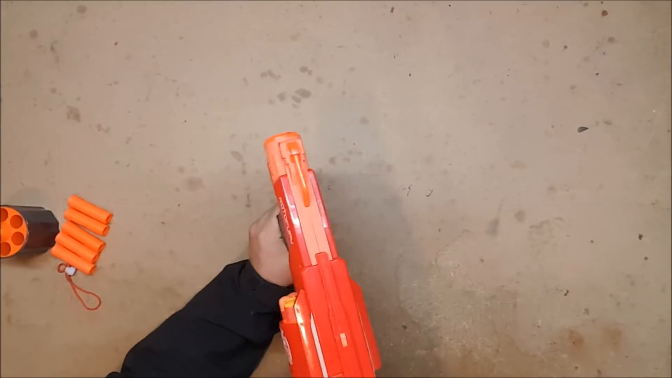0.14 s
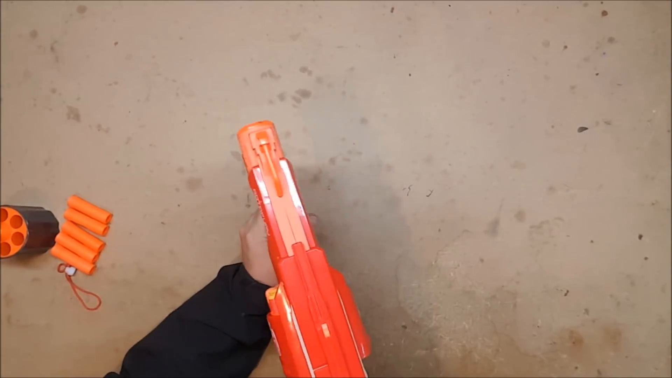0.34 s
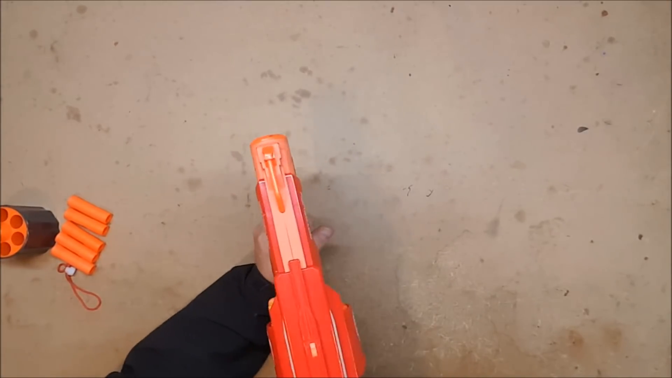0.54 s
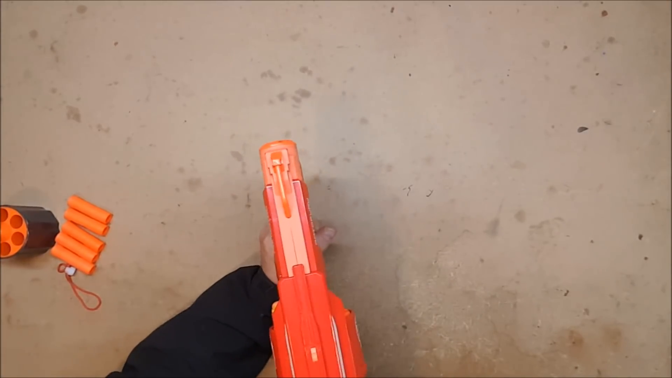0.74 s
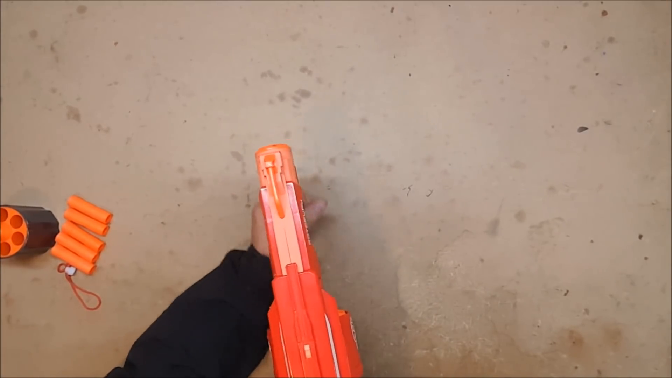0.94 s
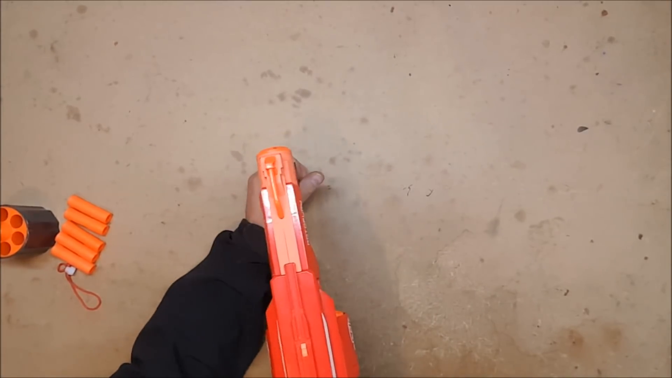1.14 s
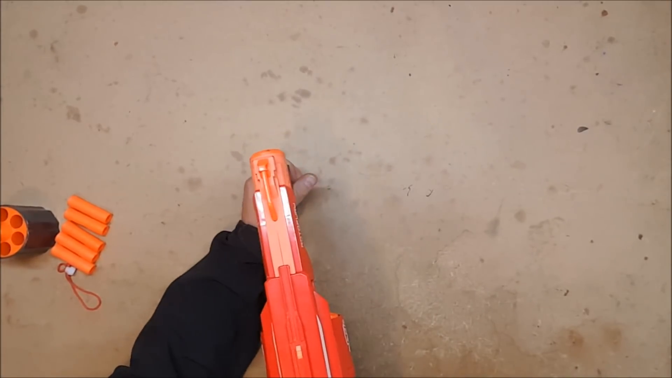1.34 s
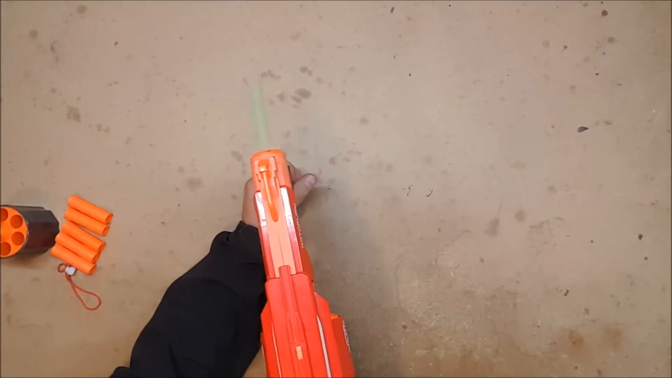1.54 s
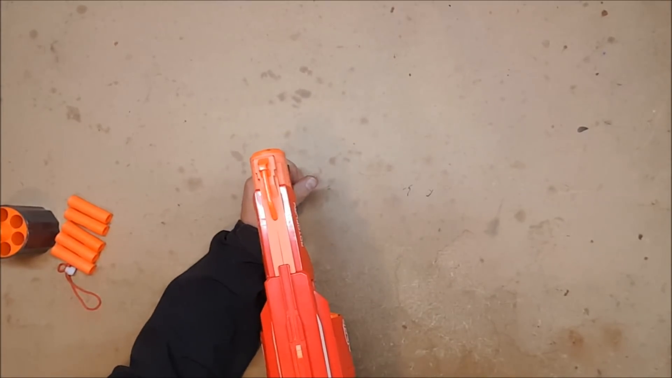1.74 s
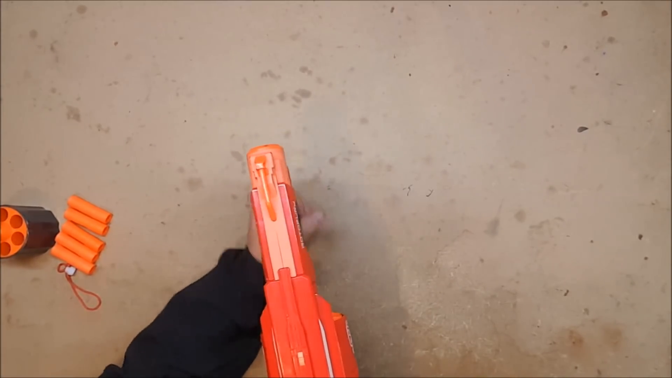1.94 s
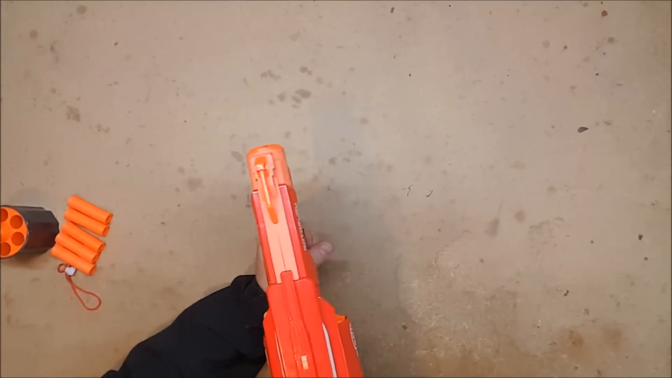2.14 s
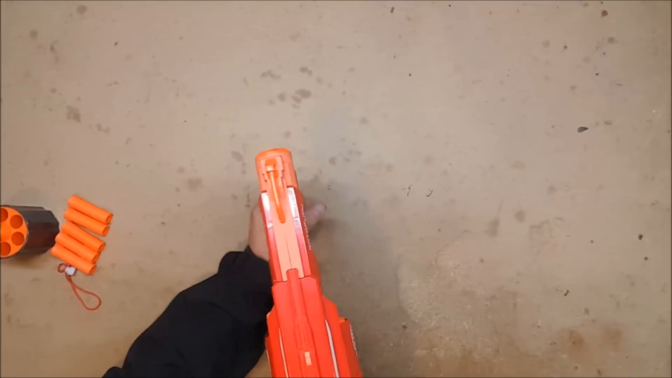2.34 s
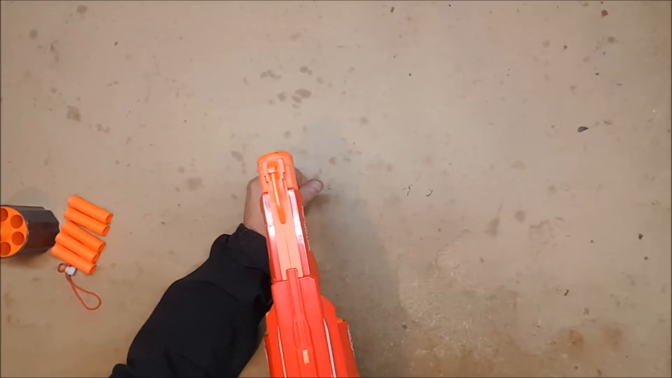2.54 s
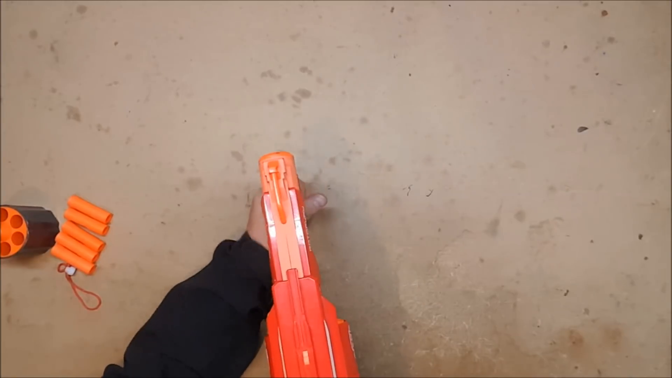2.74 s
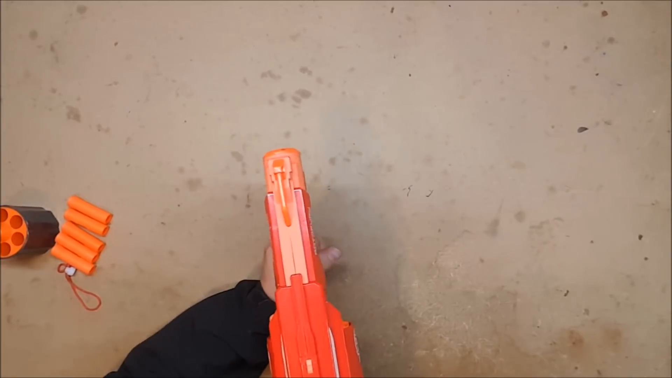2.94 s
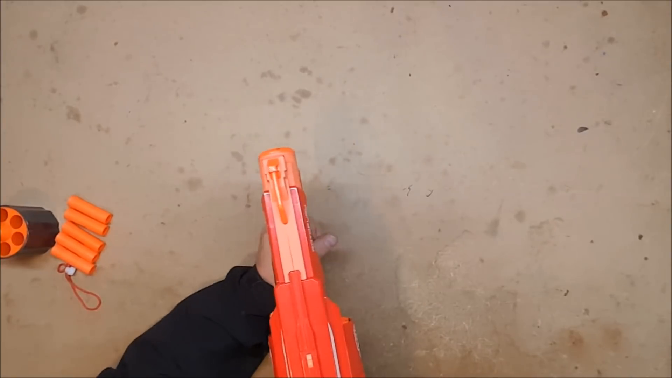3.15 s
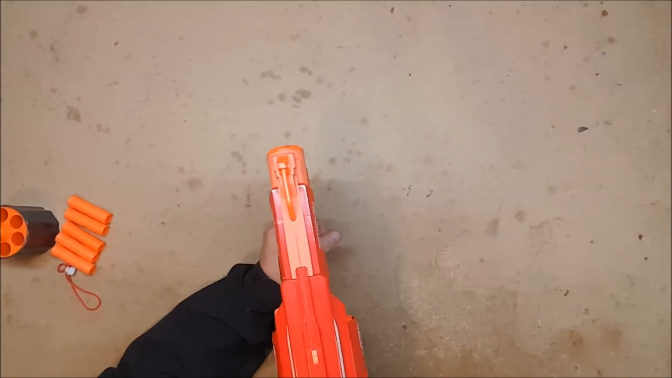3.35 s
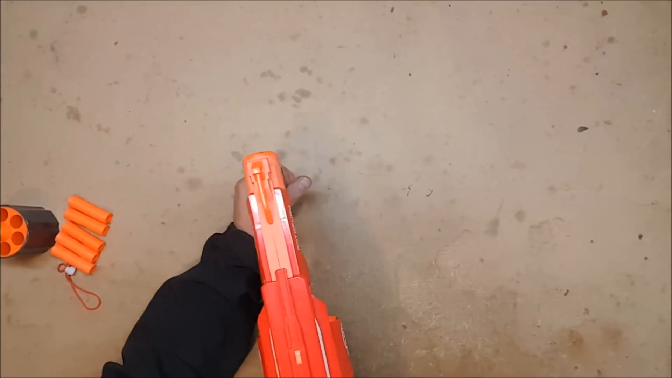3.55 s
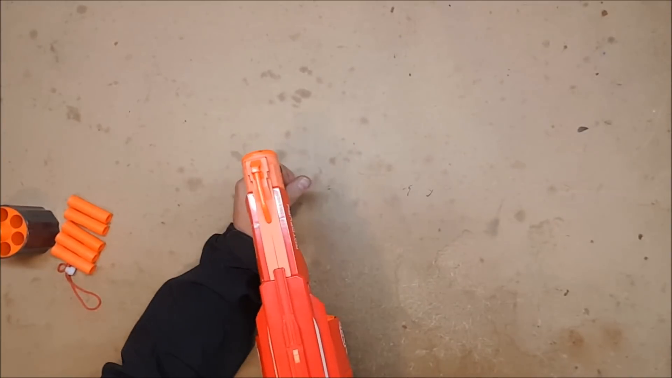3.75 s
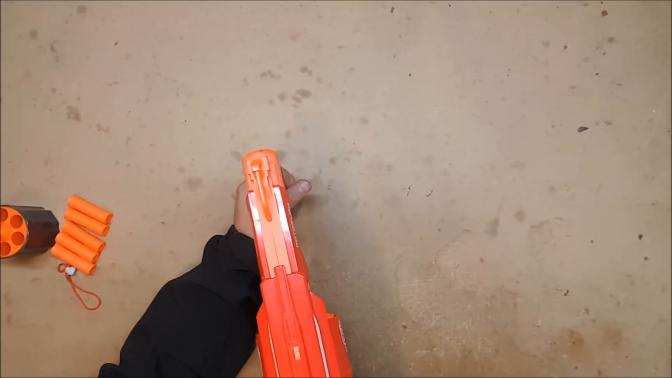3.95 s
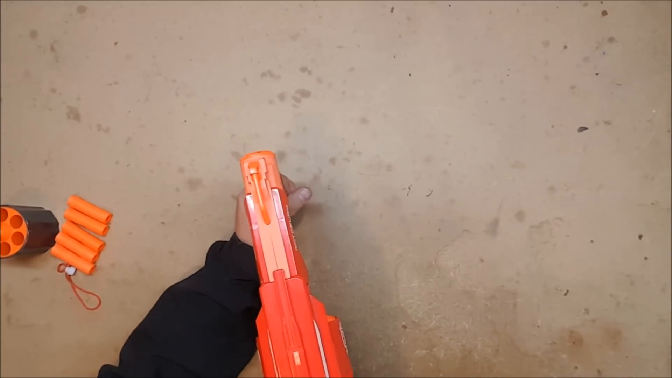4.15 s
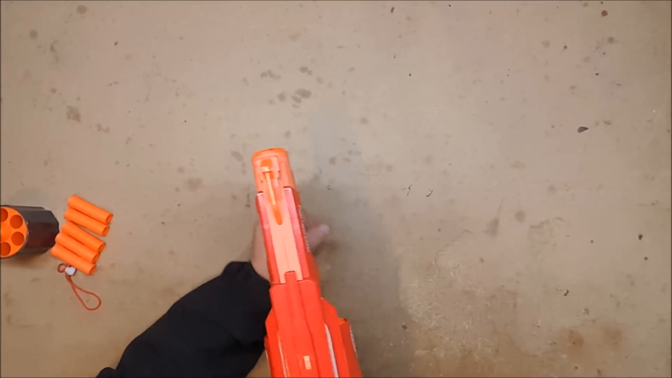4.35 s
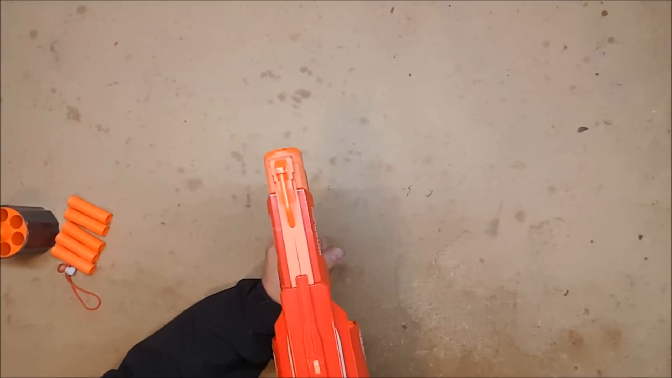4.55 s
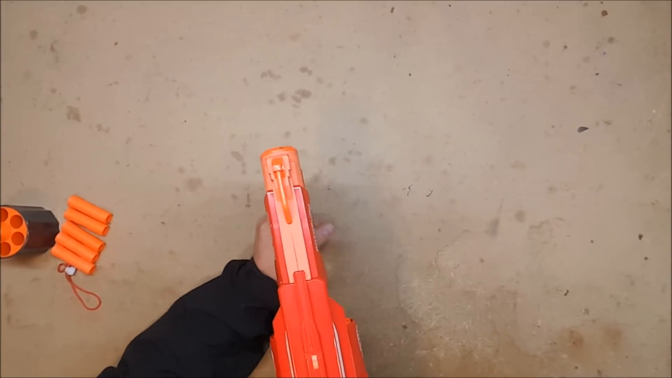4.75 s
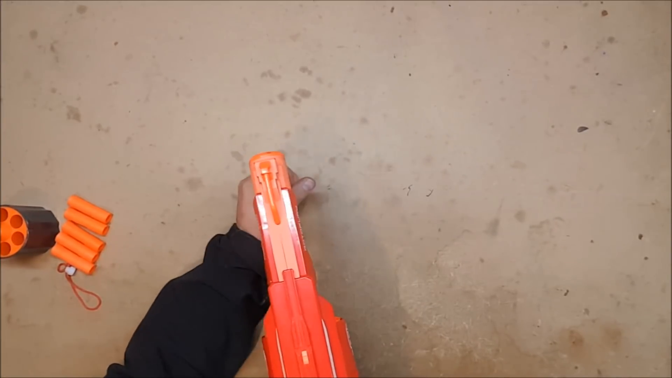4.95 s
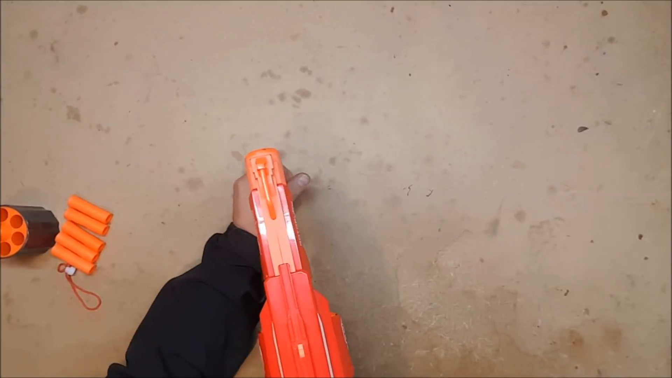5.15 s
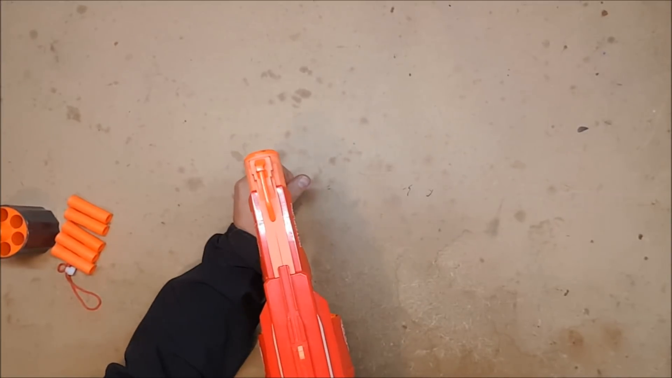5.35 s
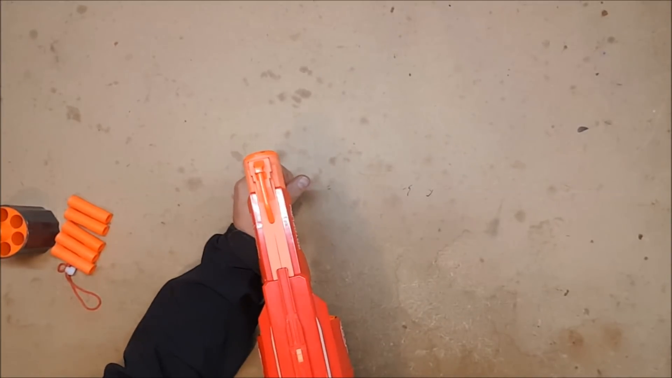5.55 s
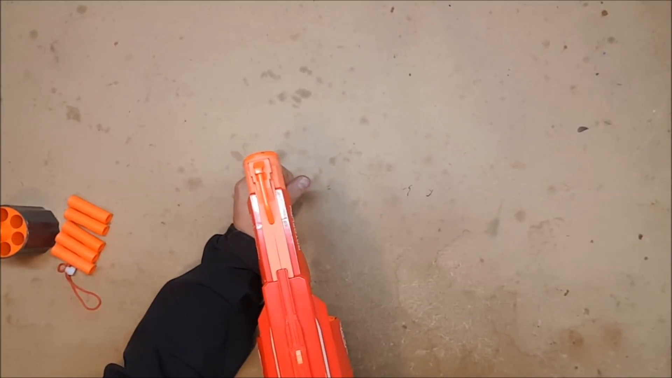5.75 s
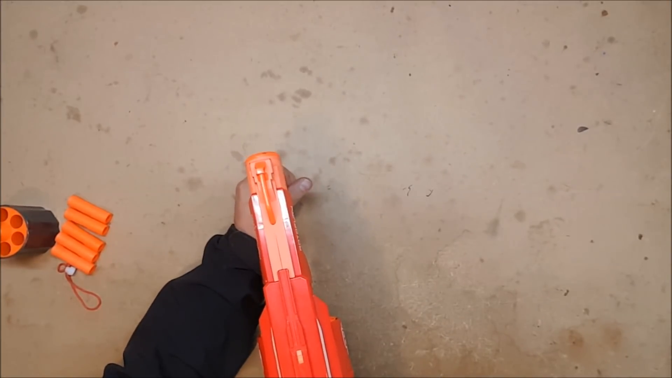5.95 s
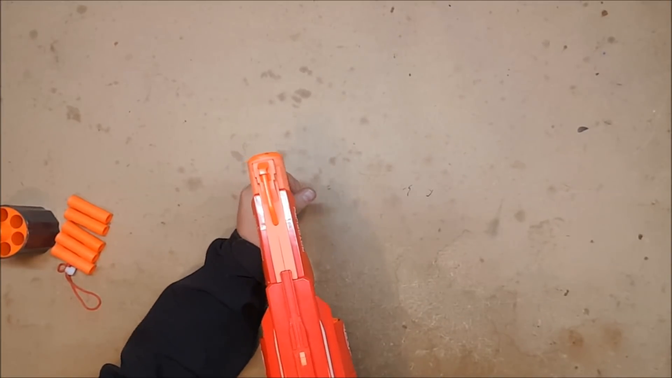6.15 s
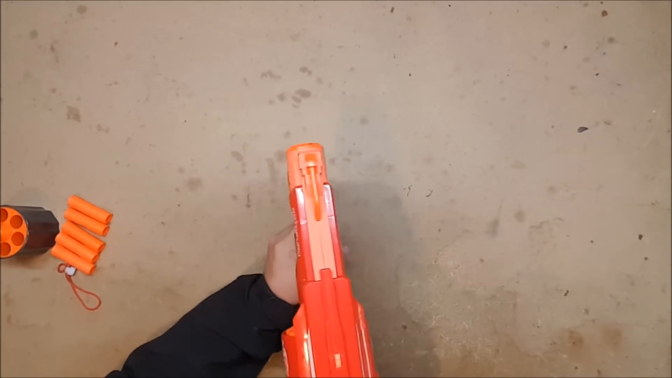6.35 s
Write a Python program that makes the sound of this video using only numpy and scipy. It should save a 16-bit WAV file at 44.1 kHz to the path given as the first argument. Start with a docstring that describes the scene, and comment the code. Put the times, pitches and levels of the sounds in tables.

```python
"""A spring-powered plastic toy blaster is pumped and fired close to the microphone in a small hard room.
Pulling the grip back runs a pawl over a ratchet; pushing it forward scrapes and slams the bolt shut.
Each shot is a catch letting go, the plunger striking home and a pop from the barrel.
Contacts are noise bursts, rubbing is gated noise, pops and booms are damped sines; a low hum swells behind."""
import sys
import numpy as np
from scipy import signal
from scipy.fft import rfft, irfft, next_fast_len
from scipy.io import wavfile
from scipy.ndimage import uniform_filter1d

SR = 44100
rng = np.random.default_rng(int(sys.argv[2]) if len(sys.argv) > 2 else 0)


def digitize_waveform(pressure):
    """Quantize a signal to 16-bit integers and store it at the path in sys.argv[1].

    Rows of a 2-D input are taken as channels; values are limited to [-1, 1].
    """
    field = np.atleast_2d(pressure).T
    bounded = np.clip(field, -1, 1)
    quanta = np.round(bounded * 32767).astype(np.int16)
    wavfile.write(sys.argv[1], SR, quanta)


N = 286209
TIME = np.arange(N) / SR
# All table levels are relative: group gains follow in scene().


def undb(db):
    """Decibels to gain."""
    return np.exp(np.asarray(db) * (np.log(10) / 20))


def unit(x):
    """Scale to rms 1."""
    return x / np.sqrt(np.mean(x ** 2))


def on_log(hz, points):
    """Read (f/Hz, value) points on a log-frequency axis."""
    f, v = np.transpose(points)
    return np.interp(np.log(np.maximum(hz, 1)), np.log(f), v)


def tint(x, points, power=1):
    """Zero-phase spectral weight from (f/Hz, gain/dB) points; power scales the dB."""
    n = x.shape[-1]
    gain = undb(power * on_log(np.fft.rfftfreq(n, 1 / SR), points))
    return irfft(rfft(x) * gain, n)


def colour(x, points, size=4096):
    """Minimum-phase filter of unit energy with the shape of (f/Hz, gain/dB) points."""
    magnitude = undb(on_log(np.fft.rfftfreq(size, 1 / SR), points))
    cepstrum = irfft(np.log(magnitude))
    cepstrum[1:size // 2] *= 2
    cepstrum[size // 2 + 1:] = 0
    response = irfft(np.exp(rfft(cepstrum)))
    return signal.fftconvolve(x, response[None] / np.linalg.norm(response))[:, :N]


def walk(rate_hz):
    """Smooth random drift, rms near 1."""
    k = int(SR / rate_hz)
    steps = np.repeat(rng.standard_normal(N // k + 1), k)
    return unit(uniform_filter1d(uniform_filter1d(steps, k), k)[:N])


def add(track, s, sound):
    """Lay a sound into a track at a time in seconds."""
    i = max(int(s * SR), 0)
    track[..., i:i + sound.shape[-1]] += sound[..., :max(N - i, 0)]


# hands and sleeve rubbing on the shell: t/s, level/dB
HANDLING = [(0, -53), (.15, -41), (.68, -55.5), (1.03, -49), (1.38, -59.5), (1.58, -52), (2.25, -61.5),
            (3.1, -66), (3.3, -53.5), (4.15, -58), (4.3, -44.5), (5.2, -54.5), (5.8, -54.5), (6.49, -51.5)]
# rubbing level dips after each shot, then returns
DIP_DB, DIP_S, RETURN_S = -16, 0.22, 0.15


def handling_db(t):
    """Rubbing level at times t; it dips after each shot, then returns."""
    dip_t, dip_share = [0, DIP_S, DIP_S + RETURN_S], [1, 1, 0]
    dip = sum(np.interp(t - s, dip_t, dip_share, left=0) for s, *_ in SHOTS)
    return np.interp(t, *np.transpose(HANDLING)) + DIP_DB * dip


def stroke(length_s, end_db, swell_db):
    """Rubbing force of one slide of the grip, growing steadily in dB to its end."""
    return undb(np.linspace(end_db - swell_db, end_db, max(int(length_s * SR), 1)))


# rubbing colour: f/Hz, level/dB
SCRAPE_COLOUR = [(40, -33), (150, -4.5), (350, -1), (600, -2), (900, -2), (1600, -4), (3000, -10.5),
                 (6000, -25.5), (10000, -27), (16000, -31.5)]
PULL_SWELL_DB, PUSH_SWELL_DB = 7, 18
# slack taken up before a push; SLACK_DB is against the rail rub
SLACK_S, SLACK_DB, SLACK_SWELL_DB = 0.07, -17.5, 15


def friction(catches, grain_db, judder_db, judder_hz, fidget_db, lead_s, lead_db, clean_share):
    """Tiny slips of uneven size: grip sliding on its rails, hands shifting. Returns mid and side."""
    force = undb(handling_db(TIME) + fidget_db * walk(35))
    for start, _, stop, *_, db in PULLS:
        add(force, start, stroke(stop - start, db, PULL_SWELL_DB))
    for start, home, _, _, db, *_ in PUSHES:
        add(force, start - SLACK_S, stroke(SLACK_S, db + SLACK_DB, SLACK_SWELL_DB))
        add(force, start, stroke(home - start, db, PUSH_SWELL_DB))
    # each catch rubs harder on its ramp until it snaps over; bright ones let go more cleanly
    ramp = np.linspace(0, 1, int(lead_s * SR)) ** 2
    for s, db, treble_db in catches:
        ramp_db = db + lead_db - clean_share * max(treble_db, -6)
        add(force, s - lead_s, undb(ramp_db) * ramp)
    roughness = undb(grain_db * walk(900) + judder_db * walk(judder_hz))
    slips = unit(rng.standard_normal((2, N)) * roughness)
    return colour(slips * uniform_filter1d(force, size=200), SCRAPE_COLOUR)


# low hum: t/s, f/Hz, level/dB
HUM = [(0, 91.04, -71), (.3, 87.17, -50), (.58, 88.87, -57), (.8, 88.42, -50), (1.3, 96.6, -47.5),
       (1.95, 91, -67), (2.95, 94, -73), (3.4, 100.4, -43), (3.72, 103.4, -40), (4.24, 101.6, -44),
       (4.35, 102.6, -36), (4.55, 99.4, -45), (4.85, 99.7, -40.5), (5.42, 99.7, -32), (5.56, 102.4, -39.5),
       (5.84, 102, -40.5), (6.1, 91.6, -60.5), (6.49, 90, -78)]
# its partials: multiple of f, level at the loudest/dB, growth/(dB per dB of hum)
HUM_PARTIALS = [(1, 0.5, 1), (.62, -19.5, 0.8), (1.26, -21.5, 1.1), (1.65, -14, 1.3), (2.63, -23.5, 1.7)]


def hum(waver_db, partial_waver_db, side_db):
    """A low drone near 100 Hz that swells and wavers; most overtones grow faster. Returns mid and side."""
    times, *columns = np.transpose(HUM)
    hz, db = (np.interp(TIME, times, column) for column in columns)
    phase = 2 * np.pi * np.cumsum(hz) / SR
    tone = 0
    for k, (multiple, top_db, growth) in enumerate(HUM_PARTIALS):
        waver = (partial_waver_db if k else waver_db) * walk(23)
        gain = undb(top_db + growth * (db - db.max()) + waver)
        tone = tone + gain * np.exp(1j * (multiple * phase + 0.18 * waver))
    return np.sqrt(2) * undb(db.max()) * np.array([tone.real, undb(side_db) * tone.imag])


# background colour: f/Hz, level/dB
AIR_COLOUR = [(15, -30.5), (25, -1), (97, 9), (394, -2.5), (624, -4), (818, -2), (1190, -13), (1520, -10),
              (8590, -27.5), (14800, -39), (16000, -46)]
AIR_DB = -57.5


def background_air():
    """Steady coloured noise, independent in mid and side."""
    return undb(AIR_DB) * unit(colour(rng.standard_normal((2, N)), AIR_COLOUR))


def chatter(decay_ms, rise_ms, part_hz, part_db, part_width_hz=130, size=4096, order=31):
    """Tiny contacts, mid and side: an even crack plus the ring of the small part that is struck."""
    ms = 1000 * np.arange(size) / SR
    shape = np.exp(-ms / decay_ms) * (1 - np.exp(-ms / rise_ms))
    spectrum = rfft(rng.standard_normal((2, size)) * shape)
    # flatten the smoothed spectrum
    even = spectrum / np.sqrt(uniform_filter1d(np.abs(spectrum) ** 2, order))
    crack = irfft(even) * np.linalg.norm(shape) * np.linspace(1, 0, size)
    part_ring = signal.lfilter(*signal.iirpeak(part_hz, part_hz / part_width_hz, SR), crack)
    return crack + undb(part_db) * part_ring


def blows(rows, points, rise_ms, split_hz, treble_db):
    """Plastic parts chatter at each contact, each with its own treble balance. Returns mid and side."""
    dull, bright = np.zeros((2, 2, N))
    for s, db, share_db, decay_ms in rows:
        part_hz = np.exp(rng.uniform(np.log(1100), np.log(6000)))
        burst = chatter(max(decay_ms, .5), rise_ms, part_hz, part_db=4)
        add(dull, s, burst * undb(db))
        add(bright, s, burst * undb(db + share_db + treble_db))
    low, high = (signal.butter(2, split_hz, kind, fs=SR) for kind in ("low", "high"))
    # second-order crossover: treble inverted to sum without a notch
    return colour(signal.lfilter(*low, dull) - signal.lfilter(*high, bright), points)


def ticks(level_db, spread_db, treble_db, decay_ms, count=130):
    """Loose parts and fingers tick at random times, their level following the rubbing level."""
    chance = rng.random((count, 3))
    times = chance[:, 0] * N / SR
    levels = handling_db(times) + level_db + spread_db * chance[:, 1] ** 2
    return [(s, db, treble_db * share, decay_ms) for s, db, share in zip(times, levels, chance[:, 2])]


# latches and loose knocks: t/s, level/dB, treble share/dB
CLACKS = [(0.036, -43, -1), (0.043, -45.5, 9), (0.097, -32.5, 7.5), (0.168, -35, 7), (0.324, -23, -2.5),
          (0.393, -37.5, 0.5), (0.466, -43, 4), (0.491, -38, 5.5), (0.583, -30, 2), (0.892, -39.5, -6),
          (0.951, -34.5, -1), (1.015, -26.5, -4), (1.336, -41, -24), (1.425, -44, -28), (1.962, -42, 7),
          (1.983, -32, -4), (2.336, -32.5, -5), (2.345, -33, -7), (2.834, -36.5, -1.5),
          (2.848, -30.5, -4.5), (3.196, -31.5, -5.5), (3.477, -37, -1.5), (3.497, -32.5, -2),
          (3.804, -59, 13.5), (4.145, -40, -3.5), (4.162, -36.5, -6), (4.221, -37.5, 5.5),
          (4.325, -23.5, 10), (4.683, -33, 4.5), (4.734, -23.5, 2), (4.791, -38.5, 1), (5.154, -35.5, -4),
          (5.196, -35.5, -0.5), (5.368, -40, -37), (6.106, -57, 7.5), (6.274, -44.5, 10)]
# grip forward: start t/s, bolt home t/s, then level/dB of unlatching, feed knock, rail rub,
# bolt strike, bolt seating
PUSHES = [(1.05, 1.097, -22.5, -19, -21, -16, -13.5), (2.442, 2.507, -26, -24, -23.5, -14.5, -21),
          (3.535, 3.5732, -24.5, -22.5, -19.5, -11.5, -22), (4.846, 4.937, -25, -31, -22.5, -12, -15)]
# FEED_SHARE: position of the feed knock along the push
FEED_SHARE, PUSH_TREBLE_DB = .43, -5.5
# small-contact colour: f/Hz, level/dB
CONTACT_COLOUR = [(40, -35.5), (120, -10), (220, 1), (400, -1), (600, -4.5), (850, -1), (1500, 0.5),
                  (2500, -0.5), (4500, -3.5), (8000, -7), (13000, -6), (16000, -15)]


def latches():
    """Loose clacks, plus the unlatching and feed knock of every push: t/s, level/dB, treble/dB."""
    rows = list(CLACKS)
    for start, home, unlatch_db, feed_db, *_ in PUSHES:
        feed_s = start + FEED_SHARE * (home - start)
        rows += [(start, unlatch_db, PUSH_TREBLE_DB), (feed_s, feed_db, PUSH_TREBLE_DB)]
    return rows


def rebounds(after_s, drop_db):
    """A loose part knocks once more, weaker, shortly after each clack: t/s, level/dB, treble/dB."""
    waits = after_s * (.5 + rng.random(len(CLACKS)))
    return [(s + wait, db + drop_db, treble_db) for (s, db, treble_db), wait in zip(CLACKS, waits)]


# shell resonances: f/Hz, width/Hz, level/dB
SHELL_MODES = [(382, 140, -5.5), (592, 7.3, -5.5), (835, 71, 3.5), (985, 170, -1.5), (1295, 35, -6.5),
               (1483, 88, -5), (1990, 130, -9.5), (3230, 150, -7.5), (3670, 240, -5), (5390, 90, -22.5),
               (6070, 190, -11.5), (8540, 1400, -6.5)]


def shell(x, ring_db):
    """The hollow housing adds its short resonances to whatever shakes it."""
    rings = sum(undb(db) * signal.lfilter(*signal.iirpeak(hz, hz / width, SR), x)
                for hz, width, db in SHELL_MODES)
    return x + undb(ring_db) * rings


# room decay: f/Hz, t60/s; a negative t60 makes the band grow until the window closes it
ROOM_T60 = [(100, -0.5), (300, -0.08), (800, 0.15), (2000, 0.2344), (5000, 0.2438), (9000, 0.2264),
            (16000, 0.14)]
# echo colour: f/Hz, level/dB
ROOM_ECHO = [(60, -9.5), (200, -1), (500, 3.5), (900, -2.5), (2500, -3), (6000, 0), (16000, -4)]


def echoes(build_s, size=16384):
    """Close hard walls: dense noise echoes build within a few ms, then follow the band's t60."""
    t, hz = np.arange(size) / SR, np.fft.rfftfreq(size, 1 / SR)
    noise, response = rfft(rng.standard_normal((2, size))), 0
    for band, (_, t60) in enumerate(ROOM_T60):
        weight = on_log(hz, [(f, k == band) for k, (f, _) in enumerate(ROOM_T60)])
        fade = undb(-60 * t / t60) * (1 - np.exp(-(t / build_s) ** 2))
        response = response + irfft(noise * weight, size) * fade / np.linalg.norm(fade)
    return tint(response, ROOM_ECHO) * np.hanning(2 * size)[size:]


def room(x, build_s, count=7, size=160):
    """Different parts of the long blaster radiate in turn, each with its own pattern of echoes."""
    part = np.arange(N) // size % count
    n = next_fast_len(N + SR // 2, True)
    total = 0
    for k in range(count):
        share = np.sqrt(np.abs(uniform_filter1d(1. * (part == k), size)))
        total = total + rfft(x * share, n) * rfft(echoes(build_s), n)
    return irfft(total, n)[:, :N]


# grip back: first tooth t/s, tooth spacing/ms, end stop t/s, tooth level/dB, gain per tooth/dB,
# tooth treble/dB, stop level/dB, stop treble/dB, rail rub/dB
# the last stop precedes its teeth, so that rub is a single sample
PULLS = [(0.177, 17.6, 0.27, -22, -0.2, 5.5, -24, 1, -38.5),
         (2.029, 15.3, 2.19, -31, 0, 3, -46.5, -34, -43.5),
         (2.888, 14.9, 2.985, -31, -1, 3, -34.5, -17.5, -42),
         (4.423, 20.0, 4.518, -24.5, -0.28, 6.5, -19, -14, -32),
         (6.333, 19.8, 5.9, -32, 0.24, 4, -38, 10, -33.5)]
TEETH, FIRST_TOOTH_DB, TOOTH_SCATTER_DB = 5, 1.5, 0.4


def ratchet():
    """Pawl over evenly spaced teeth, first one harder, plus a stop knock: t/s, level/dB, treble/dB."""
    rows = []
    scatter = TOOTH_SCATTER_DB * rng.standard_normal((len(PULLS), TEETH))
    for pull, uneven_db in zip(PULLS, scatter):
        start, tooth_ms, stop, db, gain_db, treble_db, stop_db, stop_treble_db, _ = pull
        gap_s = tooth_ms / 1000
        for k in range(TEETH):
            tooth_db = db + k * gain_db + FIRST_TOOTH_DB * (k == 0) + uneven_db[k]
            rows.append((start + k * gap_s, tooth_db, treble_db))
        rows.append((stop, stop_db, stop_treble_db))
    return rows


# shots: t/s, catch/dB, plunger/dB, plunger decay/ms, pop f/Hz, pop/dB, boom f/Hz, boom/dB,
# jolt/dB, jolt top f/Hz
SHOTS = [(1.6377, -7.5, -9, 4.5, 985, -10.5, 183.5, -19, -20, 506),
         (2.507, -18, -14, 12.8, 856, -5.5, 207.7, -24, -20.5, 268),
         (3.583, -27.5, -21, 44.5, 835, -6.5, 211.4, -22, -16.5, 604),
         (5.8651, -5.5, -18.5, 24.5, 874, -4.5, 186.5, -19, -19.5, 484)]
# seating after the bolt strikes, plunger after the catch lets go
SEAT_S, PLUNGER_S = .0065, .0065
BOLT_MS, SEAT_MS, CATCH_MS = 3.8, 6.66, 2.5
BOLT_TREBLE_DB, SEAT_TREBLE_DB, CATCH_TREBLE_DB, PLUNGER_TREBLE_DB = -1, -4.5, 3.5, 2.5
# heavy-blow colour: f/Hz, level/dB
SLAM_COLOUR = [(40, -25), (120, 4), (220, -1), (420, 2), (600, 0), (850, 1), (1500, 1.5), (2500, 0),
               (4500, -6), (8000, -10), (13000, -7), (16000, -11.5)]


def slams():
    """Paired blows, bolt then seating, catch then plunger: t/s, level/dB, treble/dB, decay/ms."""
    rows = []
    for _, home, *_, strike_db, seat_db in PUSHES:
        rows.append((home, strike_db, BOLT_TREBLE_DB, BOLT_MS))
        rows.append((home + SEAT_S, seat_db, SEAT_TREBLE_DB, SEAT_MS))
    for s, catch_db, plunger_db, plunger_ms, *_ in SHOTS:
        rows.append((s, catch_db, CATCH_TREBLE_DB, CATCH_MS))
        rows.append((s + PLUNGER_S, plunger_db, PLUNGER_TREBLE_DB, plunger_ms))
    return rows


def ring(hz, t60_s, rise_s, size=16384):
    """A damped oscillation that takes a moment to build."""
    t = np.arange(size) / SR
    return np.sin(2 * np.pi * hz * t) * 1000 ** (-t / t60_s) * (1 - np.exp(-t / rise_s))


# stock bumping in the hands: t/s, f/Hz, ring/dB, dull bump/dB, bump top f/Hz
BUMPS = [(1.105, 190, -15, -25.5, 440), (1.141, 118, -29, -29.5, 205), (1.191, 175.7, -23.5, -29.5, 325),
         (1.225, 130, -26.5, -34.5, 283.3)]
# further stock modes rung by a shot: f/Hz, level against the boom/dB
STOCK_MODES = [(127, -5), (420, -6.5), (591, -9.5)]
RECOIL_S = 0.0026  # after the catch


def recoil(t60_s, bump_s, side_db, octaves, size=16384):
    """The stock booms briefly and the jolt dies away in the hands. Returns mid and side."""
    out = np.zeros((2, N))
    fade = np.exp(-np.arange(size) / SR / bump_s)
    kicks = [(s + RECOIL_S, hz, boom_db, jolt_db, top_hz)
             for s, *_, hz, boom_db, jolt_db, top_hz in SHOTS]
    for s, hz, ring_db, bump_db, top_hz in [*kicks, *BUMPS]:
        band_hz = [top_hz / 2 ** octaves, top_hz]
        band = signal.butter(2, band_hz, "band", fs=SR, output="sos")
        bump = signal.sosfilt(band, rng.standard_normal((2, size))) * fade
        bump *= np.linalg.norm(fade) / np.linalg.norm(bump, axis=1, keepdims=True)
        add(out, s, undb(bump_db) * bump)
        add(out[0], s, undb(ring_db) * ring(hz, t60_s, rise_s=0.00047))
        # port difference trails the pressure by a quarter cycle
        add(out[1], s + 1 / (4 * hz), undb(ring_db) * ring(hz, t60_s, rise_s=.002))
    for s, _, boom_db, *_ in kicks:
        modes = sum(undb(boom_db + db) * ring(hz, t60_s, rise_s=.003) for hz, db in STOCK_MODES)
        add(out[0], s, modes)
    return out * undb([[0], [side_db]])


POP_S = .0075  # after the catch


def barrel(t60_s, rise_s):
    """The air column of the barrel pops as the dart clears it."""
    out = np.zeros(N)
    for s, _, _, _, hz, db, *_ in SHOTS:
        add(out, s + POP_S, undb(db) * ring(hz, t60_s, rise_s))
    return out


# side-signal colour: f/Hz, gain/dB
SIDE_COLOUR = [(60, -9.5), (250, -12.5), (700, -8), (1300, -5.5), (2400, -4.5), (4400, -1.5), (16000, -1)]
# left/right tilt shape, scaled per channel below: f/Hz, tilt/dB
CHANNEL_TILT = [(100, 0.3), (1000, 0.5), (2400, 1), (4400, 0), (8200, 2.5), (15000, 2.5)]


def scene():
    """Blaster, room and background as mid and side, heard by two close ports."""
    latch_ms, tooth_ms = 3.0, 3.6
    small = [(*row, latch_ms) for row in latches() + rebounds(after_s=0.0098, drop_db=-14)]
    small += ticks(level_db=-2, spread_db=3, treble_db=8, decay_ms=0.74)
    parts = undb(9) * blows(small, CONTACT_COLOUR, rise_ms=1.0, split_hz=2030, treble_db=-4.5)
    teeth = ratchet()
    tooth_rows = [(*row, tooth_ms) for row in teeth]
    parts += undb(7.5) * blows(tooth_rows, CONTACT_COLOUR, rise_ms=1.0, split_hz=1530, treble_db=-1.5)
    parts += undb(4.5) * blows(slams(), SLAM_COLOUR, rise_ms=0.96, split_hz=8200, treble_db=-0.5)
    rub = friction(latches() + teeth, grain_db=4.0, judder_db=3.5, judder_hz=142.1, fidget_db=1.8,
                   lead_s=0.019, lead_db=-11, clean_share=0.23)
    near = shell(parts + undb(-2.5) * rub, ring_db=-1.0)
    pop = undb(4.0) * barrel(t60_s=0.039, rise_s=0.0009)
    boom = recoil(t60_s=0.23, bump_s=0.029, side_db=-1, octaves=2.44)
    echo = room(near[0] + undb(-5.5) * (pop + boom[0]), build_s=0.0033)
    drone = hum(waver_db=1.2, partial_waver_db=4.5, side_db=-10)
    mid, side = near + boom + echo + background_air() + drone
    mid, side = mid + pop, tint(side, SIDE_COLOUR)
    left = tint(mid + side, CHANNEL_TILT, 0.44)
    right = tint(mid - side, CHANNEL_TILT, -0.99)
    lag_samples = 2  # sound reaches the left port sooner
    return np.array([left, np.pad(right, (lag_samples, 0))[:N]])


TOP_HZ = 15900


def record(dry):
    """The recorder rounds only the peaks near full scale and cuts the top."""
    rounded = dry / (1 + dry ** 4) ** .25
    return signal.sosfilt(signal.ellip(8, .2, 60, TOP_HZ, fs=SR, output="sos"), rounded)


dry = scene()
out = record(dry)
digitize_waveform(out)
```